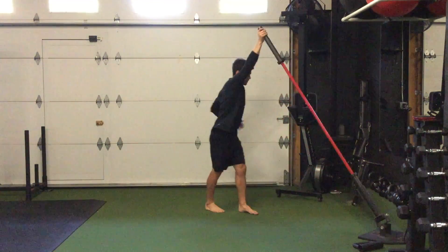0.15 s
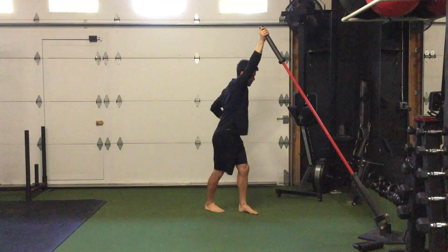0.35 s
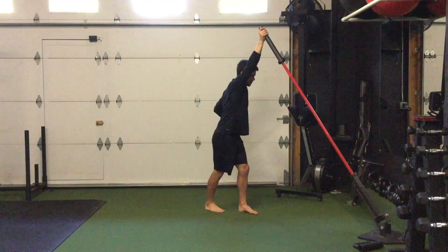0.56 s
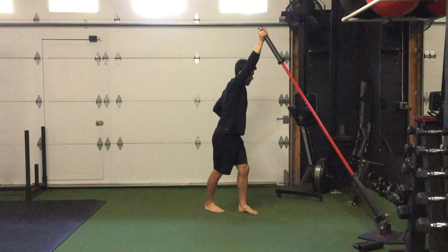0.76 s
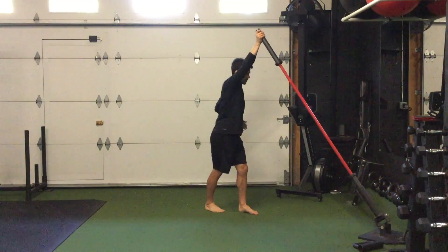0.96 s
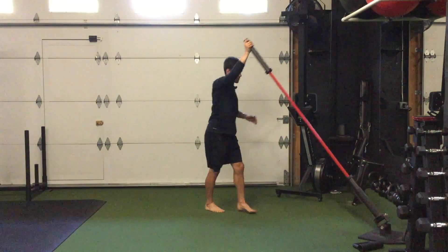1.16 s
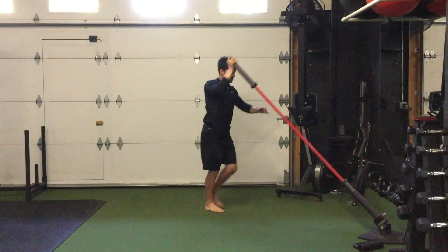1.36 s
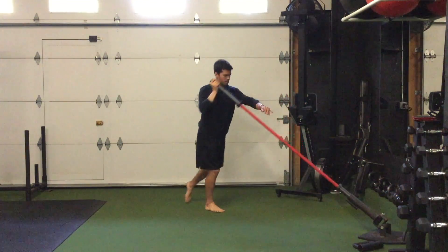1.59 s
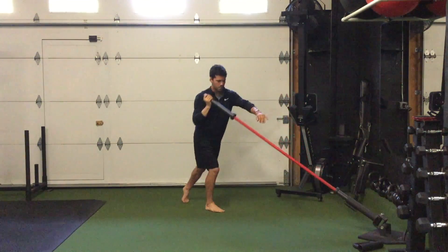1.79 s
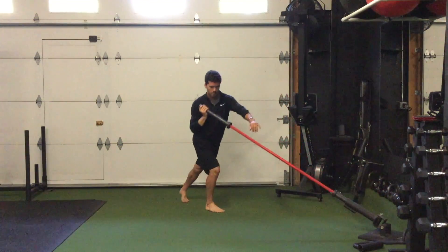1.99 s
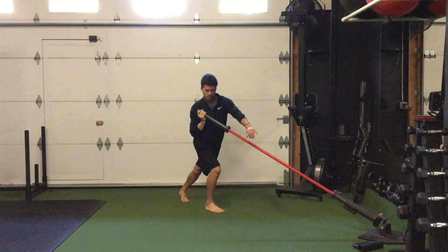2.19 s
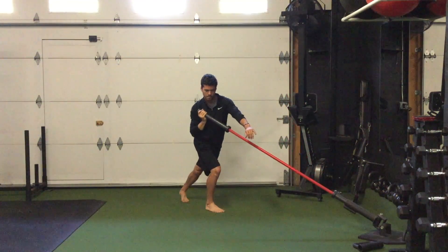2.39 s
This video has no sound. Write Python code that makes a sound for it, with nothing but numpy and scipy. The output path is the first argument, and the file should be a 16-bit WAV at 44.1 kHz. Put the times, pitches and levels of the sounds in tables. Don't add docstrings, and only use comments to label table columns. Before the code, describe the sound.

A metal barbell hinge squeaks briefly, then knocks and clanks, ringing out in a bare garage gym

```python
import sys
import numpy as np
from scipy import signal
from scipy.fft import rfft, irfft
from scipy.io import wavfile

SR = 44100
rng = np.random.default_rng(int(sys.argv[2]) if len(sys.argv) > 2 else 0)


def put_to_file(sound):
    columns = np.atleast_2d(sound).T
    safe = np.clip(columns, -1, 1)
    whole_steps = np.round(safe * 32767)
    wavfile.write(sys.argv[1], SR, whole_steps.astype(np.int16))


def volts_from_db(level):
    exponent = np.asarray(level, float) / 20
    return 10 ** exponent


N = 107559

# time [s], level of the first partial [dB], level of the second [dB].
SQUEAL = [
    (.008, -70, -72.5),
    (.042, -43, -46.5),
    (0.102, -37, -43),
    (0.131, -41, -43),
    (0.15, -45, -95),
    (0.161, -41.5, -45.5),
    (.172, -52, -77.5),
    (.197, -33, -47.5),
    (0.227, -44, -56),
]
# multiple of the pitch, level [dB].
UPPER = [(3, -71), (4, -76), (5, -83), (6, -86), (7, -85), (8, -87), (9, -90), (15, -105)]
# frequency [Hz], level [dB per Hz].
GRIT = [(2600, -21), (3200, 2), (5000, 0), (7000, -5), (9500, -5.5), (15000, -35)]
SQUEAL_HZ, WOBBLE_HZ = 959.3, 1.5
WAVER_DB, WAVER_HZ = 4.5, 25
RING_ON_T60_S, RING_WAVER_DB = 1.0, 1.5
GRIP_S, STOP_S = .008, .19
GRIT_DB = -79

# time [s], level [dB].
KNOCKS = [
    (.194, -34.5),
    (.203, -33.5),
    (.219, -34),
    (.243, -37),
    (.285, -34.5),
    (.335, -34.5),
    (.40, -37.5),
    (.44, -36.5),
]
# time [s], level [dB].
CLANKS = [
    (.194, -52),
    (.205, -50),
    (.219, -44),
    (.309, -29.5),
    (.316, -38.5),
    (.324, -30),
    (.334, -35),
    (.345, -55),
]
# frequency [Hz], level [dB], t60 [s].
BAR = [(196, -6, .1), (235, -6, .1), (302, -2, .1), (400, -1, .08), (433, 1.5, .12), (545, -14, .05),
       (711, -9, .06), (860, -8, .06), (1145, -4, .1), (1240, -4, .12), (1497, -9, .08), (4100, -17, .03),
       (5650, -18, .04), (14325, -30, .22)]
# frequency [Hz], level [dB], t60 [s].
SLEEVE = [(2097, -7, .04), (2377, -7, .04), (2725, -8, .04), (3030, -6, .06), (3424, -5, .04),
          (4355, -1, .05), (5600, -6, .03), (7050, -10, .04), (8140, -12, .08), (9641, -2, .03),
          (10700, -10, .02), (12260, -18, .07), (13630, -16, .03), (8624, -15, .42)]
# frequency [Hz], level [dB per Hz].
KNOCK_CRACK = [(90, -17), (200, -3), (450, 0.5), (1300, -3.5), (1600, -5), (3000, -17), (8000, -27.5),
               (15500, -55)]
# frequency [Hz], level [dB per Hz].
CLANK_CRACK = [(300, -6), (500, -17.5), (1000, -0.5), (1400, -3), (2500, -1.5), (6000, -11), (10000, -21.5),
               (15500, -31)]
KNOCK_CRACK_DB, CLANK_CRACK_DB = 2, -1
CRACK_S, RATTLE_PER_S = .008, 2500

# start [s], rise [s], fall [s], level [dB].
SHUFFLES = [
    (.2, 0.057, 0.033, -60),
    (1.10, 0.03, 0.52, -79),
    (1.41, 0.043, 0.028, -89),
    (1.80, .15, 0.29, -77.5),
]
# frequency [Hz], level [dB per Hz].
SHUFFLE = [(940, -46), (1600, -6), (2190, -6), (3800, -4), (6230, -12), (14500, -19), (15500, -20.5)]
# time [s], level [dB].
SCUFFS = [
    (1.295, -74.5),
    (1.43, -93),
    (1.777, -76),
]
# time [s], level [dB], pitch [Hz], t60 [s].
STEPS = [(.235, -44.5, 151.2, 0.21), (0.432, -49, 138.2, 0.27), (1.237, -54, 90, 0.063),
         (1.317, -53, 96.5, 0.056), (1.399, -61, 104, .1), (1.509, -54, 177.3, 0.23),
         (1.69, -48, 185.8, 0.28), (1.719, -46, 150, 0.063), (2.241, -55.5, 118.3, 0.28),
         (2.341, -53, 92, 0.072), (2.38, -56, 93, 0.14)]
SCUFF_HZ, SCUFF_S = (1690, 2500), 0.039
STEP_SOFT_HZ = 150

# frequency [Hz], t60 [s].
ROOM = [(100, 1.12), (400, 1), (1300, 0.99), (1700, 0.77), (3000, 0.74), (6000, 0.68), (10000, 0.32),
        (15000, .35)]
SQUEAL_WET_DB, HIT_WET_DB, BUILD_S = -22, 4, 0.028
# frequency [Hz], level [dB per Hz].
TONE = [(40, -5.5), (60, -4.5), (164, -3.5), (300, -10), (400, -19.5), (1450, -19.5), (1750, -32.5),
        (15500, -45)]
TONE_DB, LUMPS_DB = -65.5, -2.5
FAN_HZ, FAN_WIDTH_HZ, FAN_DB = 1320, 140, -80
MIC_LOW_HZ, MIC_HIGH_HZ = 45, 14500


def rms_one(x):
    return x / np.sqrt(np.mean(x ** 2) + 1e-20)


def noise():
    return rng.standard_normal(N)


def at_hz(points, hz):
    table = np.array(points)
    return np.interp(np.log(hz), np.log(table[:, 0]), table[:, 1])


def drift(rate_hz):
    settle = 9000
    r = np.exp(-2 * np.pi * rate_hz / SR)
    wander = signal.lfilter([1], [1, -2 * r, r * r], rng.standard_normal(N + settle))
    return rms_one(wander[settle:])


def filtered(x, order, hz, kind="low"):
    return signal.sosfilt(signal.butter(order, hz, kind, fs=SR, output="sos"), x)


def coloured(x, spectrum):
    hz = np.fft.rfftfreq(len(x), 1 / SR) + 1
    low = np.minimum(hz / spectrum[0][0], 1) ** 2
    return irfft(rfft(x) * volts_from_db(at_hz(spectrum, hz)) * low, len(x))


def ring(clicks, hz, t60):
    r = volts_from_db(-60 / (t60 * SR))
    w = 2 * np.pi * hz / SR
    return signal.lfilter([0, np.sin(w)], [1, -2 * r * np.cos(w), r * r], clicks + 1e-18)


def squeal():
    t = np.arange(N) / SR
    s, first_db, second_db = np.transpose(SQUEAL)
    phase = 2 * np.pi * np.cumsum(SQUEAL_HZ + WOBBLE_HZ * drift(WAVER_HZ)) / SR
    after = np.clip(t - s[-1], 0, None)
    partials = 0
    for k, db in enumerate((first_db, second_db)):
        waver_db = RING_WAVER_DB * np.minimum(after / 0.01, 1) * drift(31)
        height = np.interp(t, s, volts_from_db(db)) * volts_from_db(-60 * after / RING_ON_T60_S + waver_db)
        partials = partials + height * np.sin((k + 1) * phase + k * np.pi / 2)
    grip = np.clip((t - GRIP_S) / 0.0067, 0, 1) * np.clip((STOP_S - t) / 0.0083 + 1, 0, 1)
    for k, db in UPPER:
        height = grip * volts_from_db(db + WAVER_DB * drift(WAVER_HZ))
        partials += height * np.sin(round(k) * phase + 1.05 * drift(WAVER_HZ))
    grit = grip * volts_from_db(GRIT_DB) * rms_one(coloured(noise(), GRIT))
    return np.sqrt(2) * partials + grit


def struck(contacts, modes, crack, crack_db):
    s, db = np.transpose(contacts)
    pulses = np.zeros(N)
    pulses[(s * SR).astype(int)] = volts_from_db(db)
    fade = signal.lfilter([1], [1, -np.exp(-1 / (CRACK_S * SR))], pulses)
    touched = rng.random(N) < RATTLE_PER_S / SR
    touches = fade * touched / np.sqrt(RATTLE_PER_S * CRACK_S / 2)
    ringing = np.zeros(N)
    for hz, level_db, t60 in modes:
        rung = ring(touches * volts_from_db(level_db - 15.5) * noise(), hz, t60)
        ringing += filtered(rung, 2, min(3 * hz, .45 * SR))
    white = noise()
    burst = coloured(fade * white, crack) / np.std(coloured(white, crack))
    return ringing + volts_from_db(crack_db - 8.5) * burst


def bar_knocks():
    return struck(KNOCKS, BAR, KNOCK_CRACK, KNOCK_CRACK_DB)


def sleeve_clanks():
    return struck(CLANKS, SLEEVE, CLANK_CRACK, CLANK_CRACK_DB)


def shuffles():
    t, stroke = np.arange(N) / SR, np.zeros(N)
    for s, rise, fall, db in SHUFFLES:
        ramp = np.minimum((t - s) / rise, 1 + (s + rise - t) / fall)
        stroke += volts_from_db(db) * np.clip(ramp, 0, 1) ** 0.51
    return stroke * volts_from_db(1.0 * drift(22)) * rms_one(coloured(noise(), SHUFFLE))


def scuffs():
    t, rub = np.arange(N) / SR, np.zeros(N)
    for s, db in SCUFFS:
        rub += volts_from_db(db) * (t > s) * np.exp(-np.abs(t - s) / SCUFF_S)
    return rub * rms_one(filtered(noise(), 2, SCUFF_HZ, "band"))


def footfalls():
    thuds = np.zeros(N)
    for s, db, hz, t60 in STEPS:
        landing = 1.0 * (np.arange(N) == int(s * SR))
        thuds += volts_from_db(db) * ring(landing, hz, t60)
    return filtered(thuds, 1, STEP_SOFT_HZ)


def room(x):
    t = np.arange(SR) / SR
    edges = 50 * 2 ** np.arange(0, 8.6, .5)
    white, tail = rng.standard_normal((2, SR)), 0
    for k, (low, high) in enumerate(zip(edges, edges[1:])):
        t60 = at_hz(ROOM, np.sqrt(low * high))
        band = filtered(white[k % 2], 2, [low, high], "band")
        tail = tail + band * 10 ** (-3 * t / t60) / np.sqrt(SR * t60 / (6 * np.log(10)))
    return signal.fftconvolve(x, tail * (1 - np.exp(-t / BUILD_S)))[:N]


def room_tone():
    tone = volts_from_db(TONE_DB) * rms_one(coloured(noise(), TONE))
    bass = signal.sosfiltfilt(signal.butter(2, 300, fs=SR, output="sos"), tone)
    lumpy_bass = bass * volts_from_db(LUMPS_DB * drift(17) - 2.0)
    edges = [FAN_HZ - FAN_WIDTH_HZ / 2, FAN_HZ + FAN_WIDTH_HZ / 2]
    fan = volts_from_db(FAN_DB) * rms_one(filtered(noise(), 2, edges, "band"))
    return tone - bass + lumpy_bass + fan


def scene():
    hinge = squeal()
    blows = bar_knocks() + sleeve_clanks()
    wet = room(volts_from_db(SQUEAL_WET_DB) * hinge + volts_from_db(HIT_WET_DB) * blows)
    feet = shuffles() + scuffs() + footfalls()
    return (hinge + blows + wet + feet + room_tone())[None]


def low_pass(x):
    return signal.sosfilt(signal.butter(12, 15670, fs=SR, output="sos"), x)


def record(dry):
    mic = filtered(dry, 4, MIC_LOW_HZ, "high")
    mic = filtered(mic, 4, MIC_HIGH_HZ)
    return low_pass(mic)


dry = scene()
out = record(dry)
put_to_file(out)
```